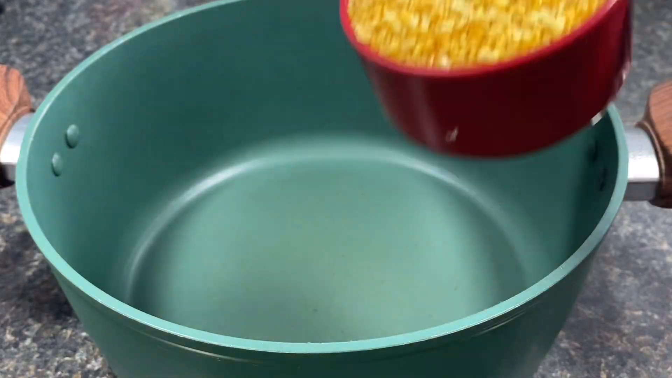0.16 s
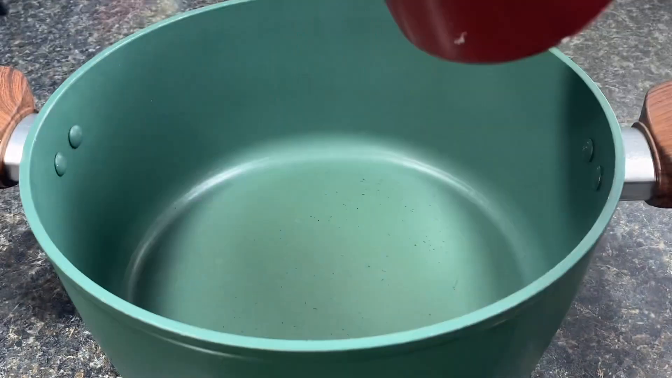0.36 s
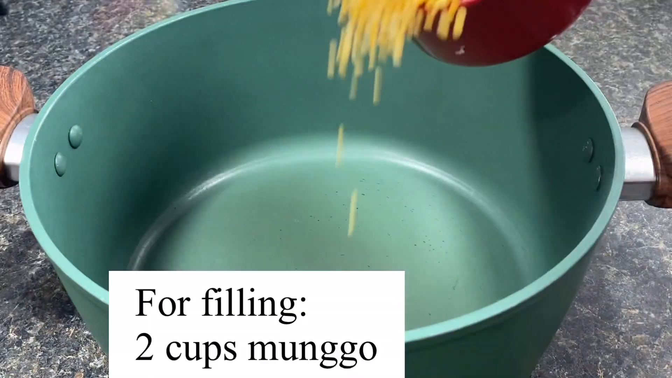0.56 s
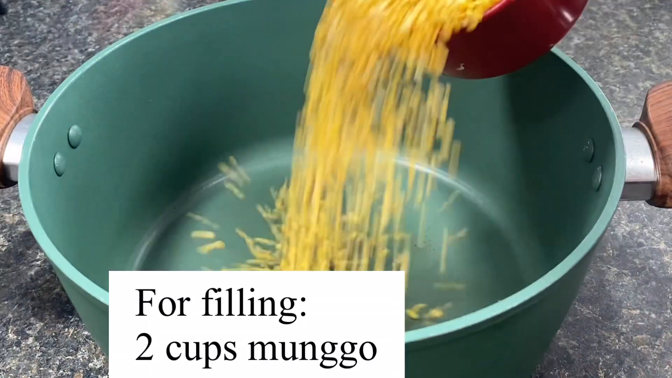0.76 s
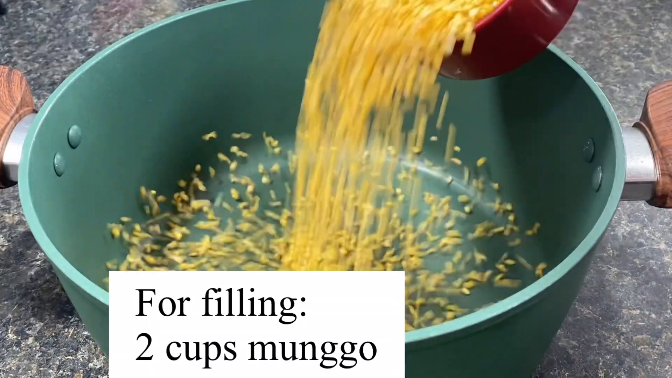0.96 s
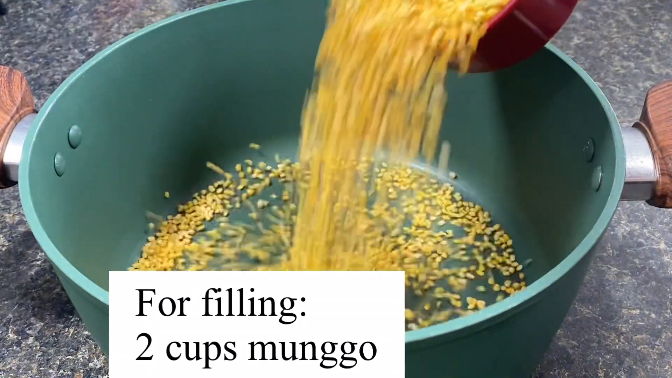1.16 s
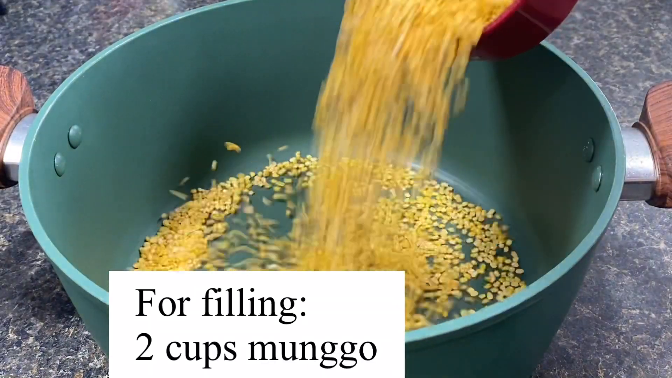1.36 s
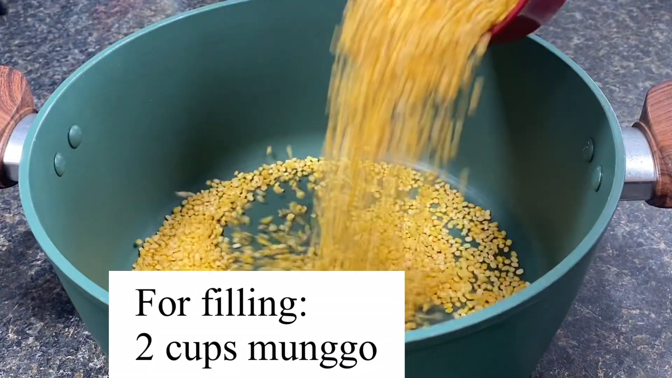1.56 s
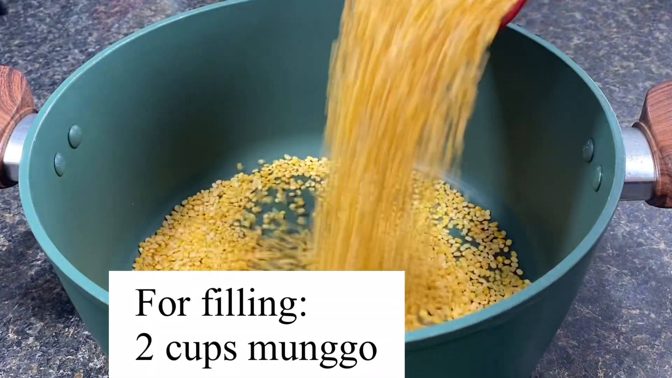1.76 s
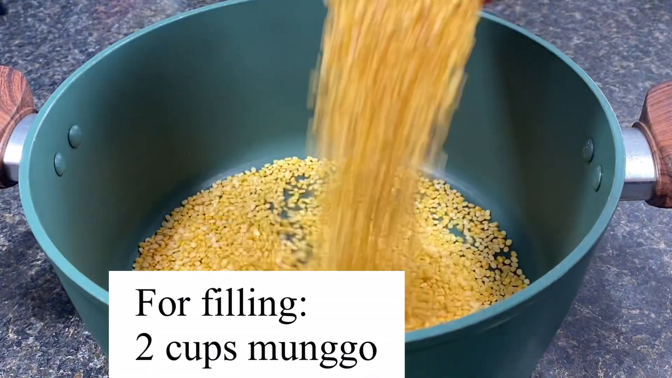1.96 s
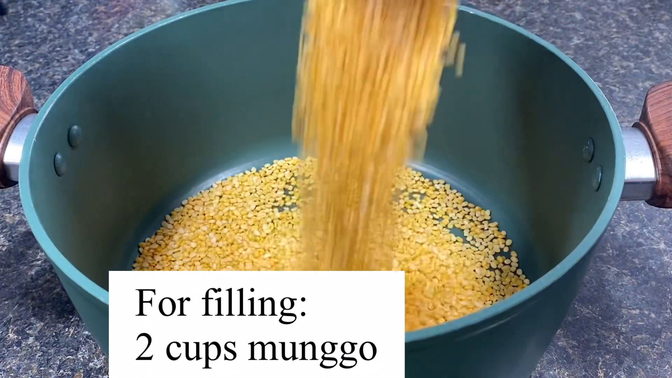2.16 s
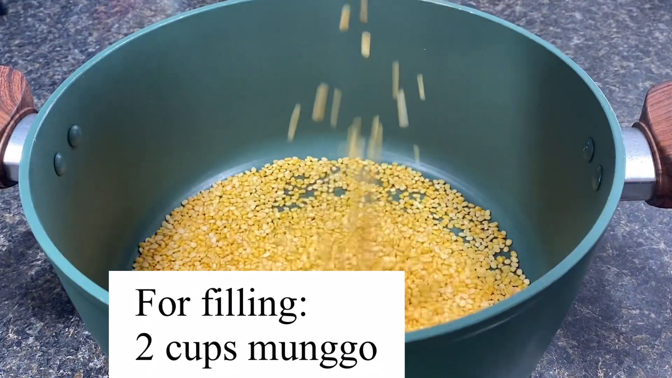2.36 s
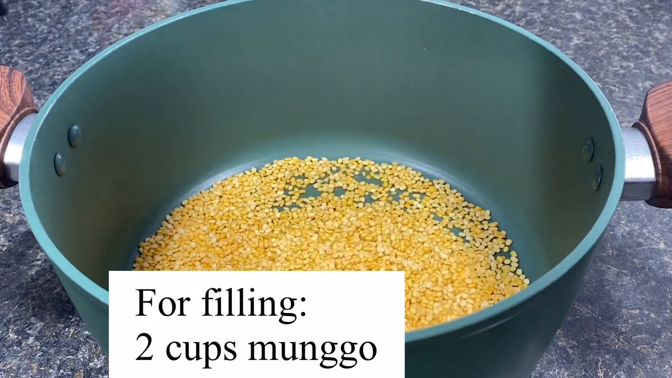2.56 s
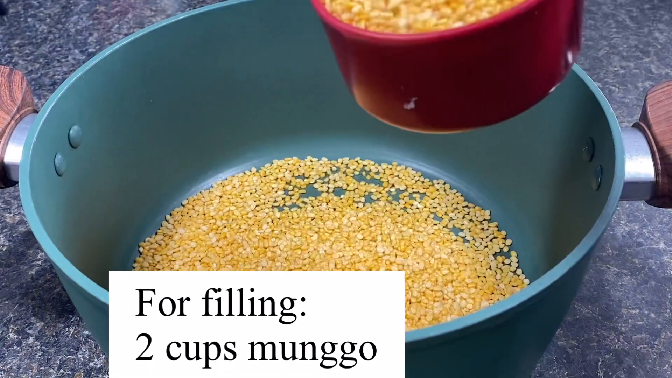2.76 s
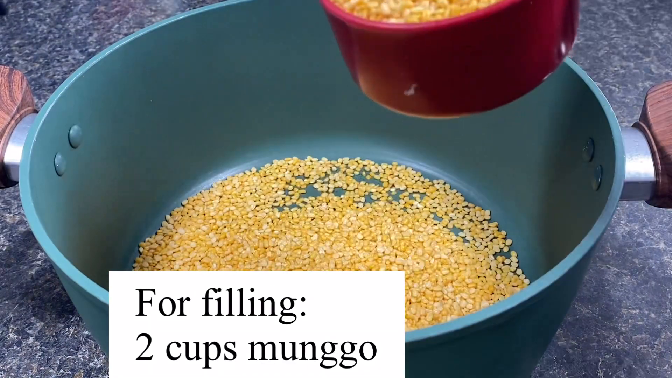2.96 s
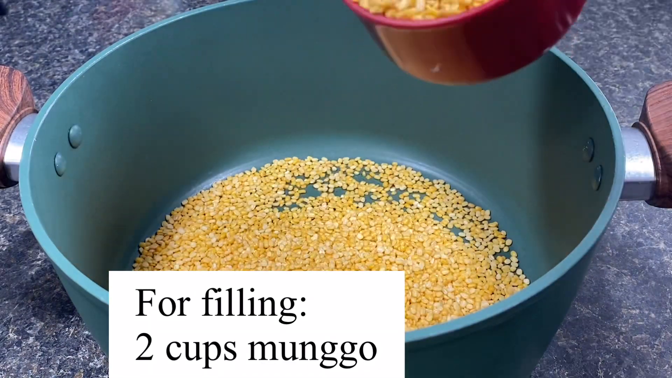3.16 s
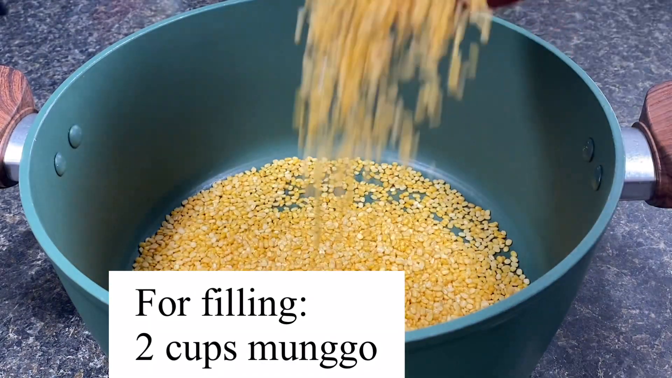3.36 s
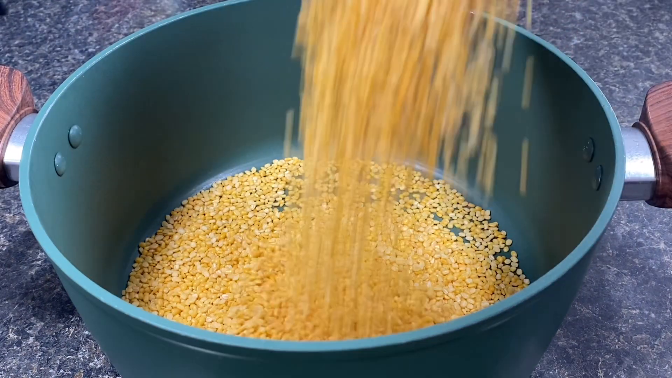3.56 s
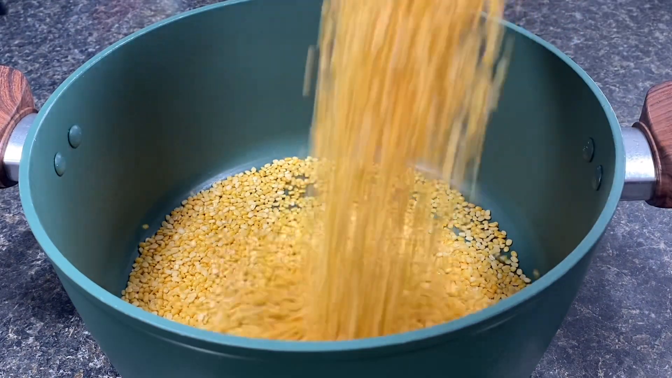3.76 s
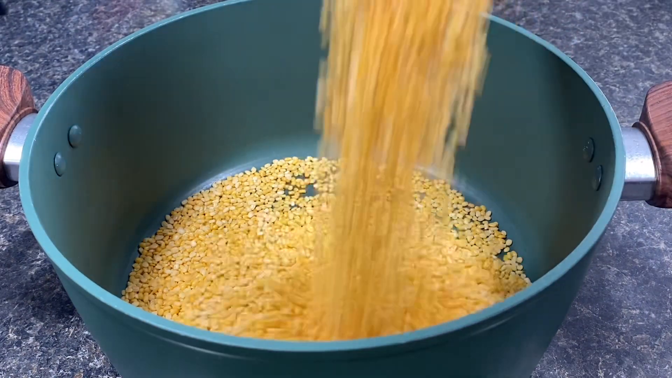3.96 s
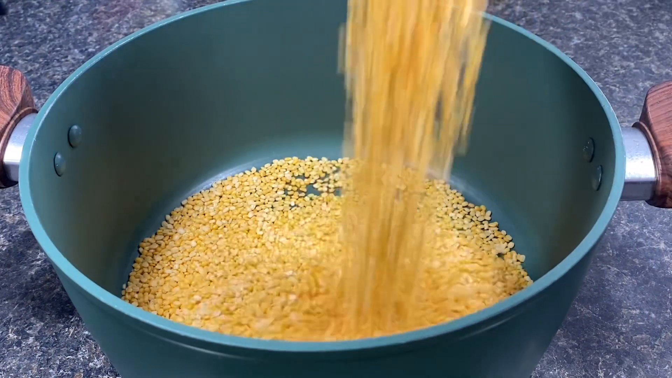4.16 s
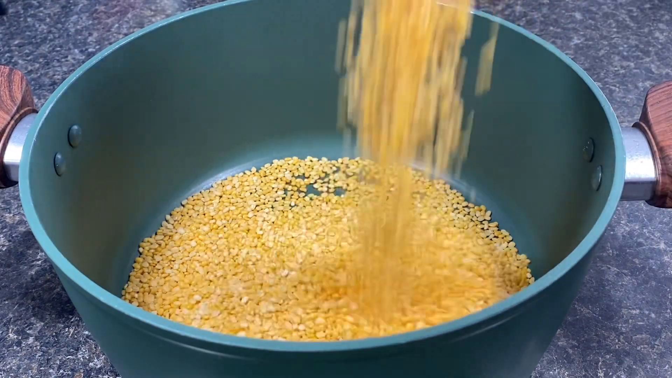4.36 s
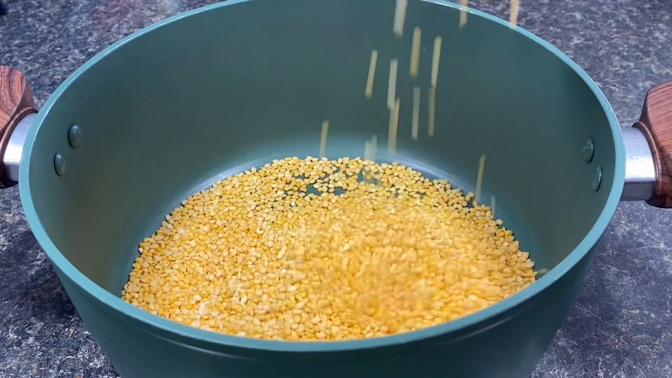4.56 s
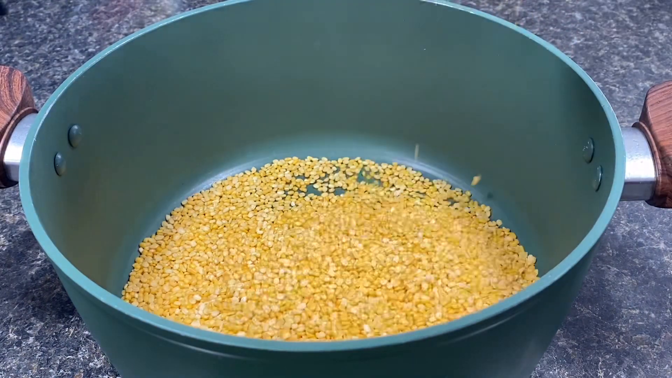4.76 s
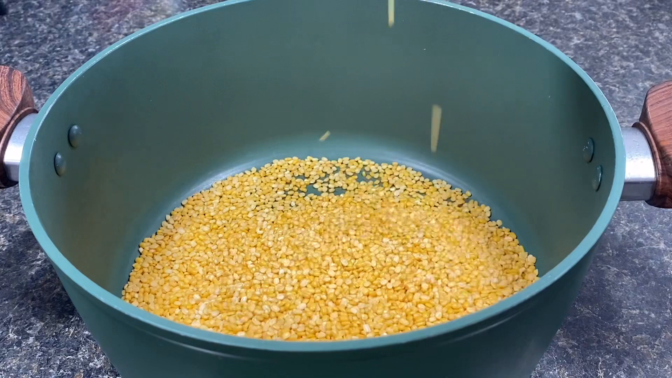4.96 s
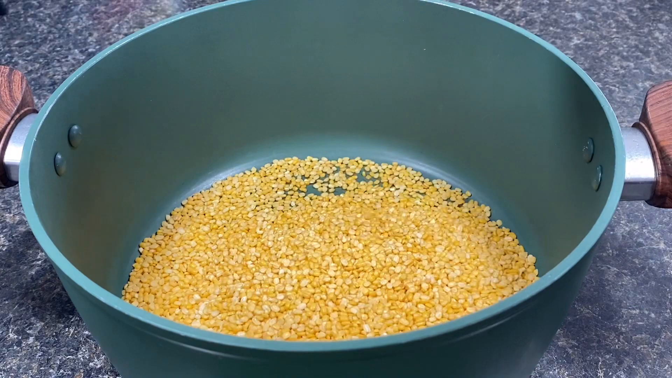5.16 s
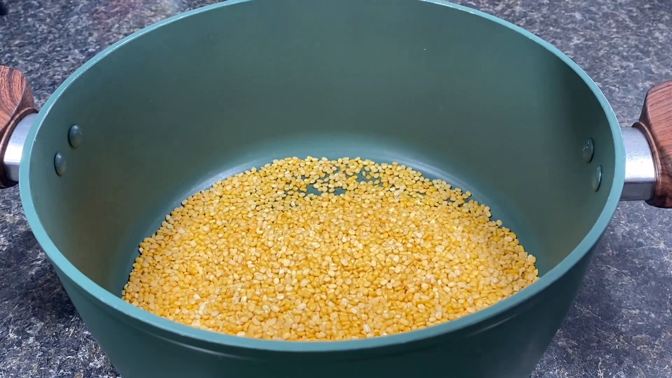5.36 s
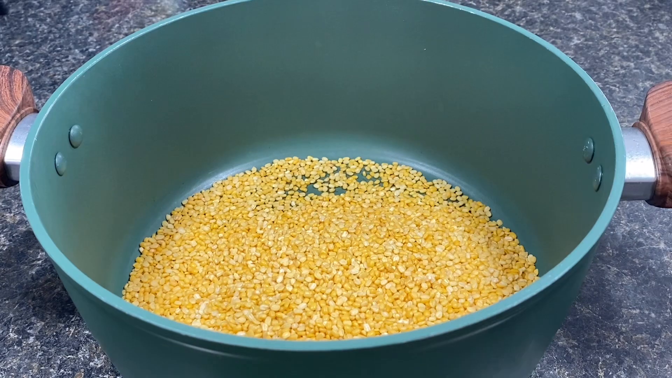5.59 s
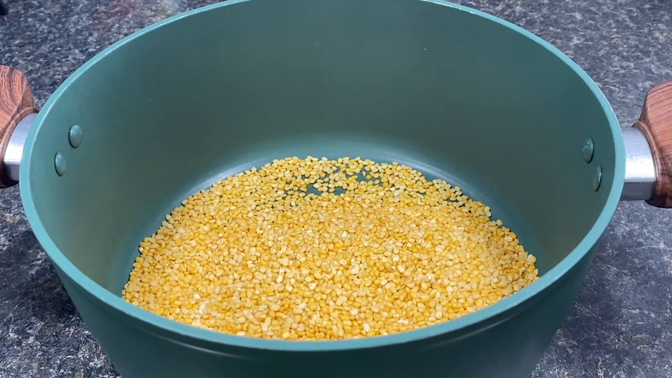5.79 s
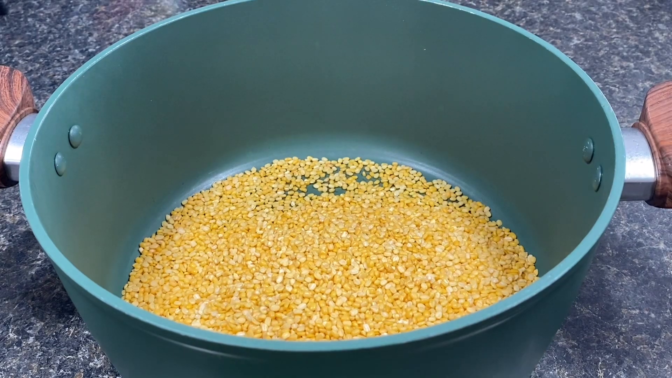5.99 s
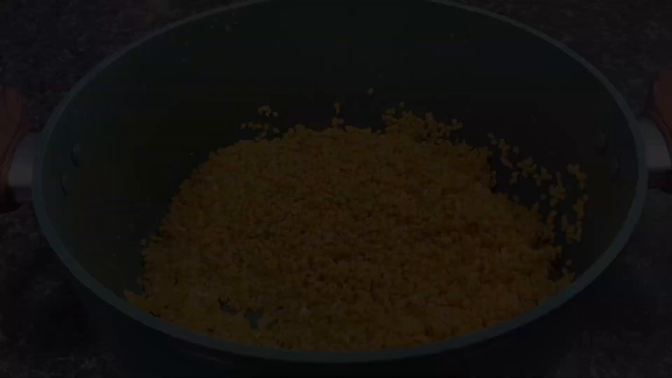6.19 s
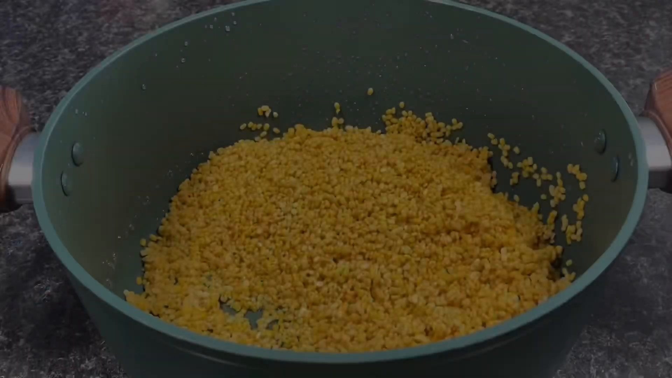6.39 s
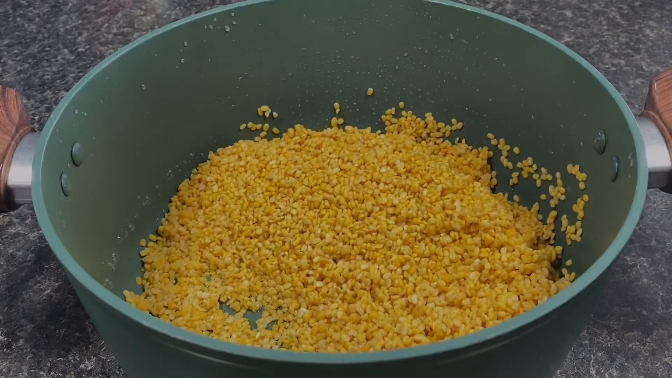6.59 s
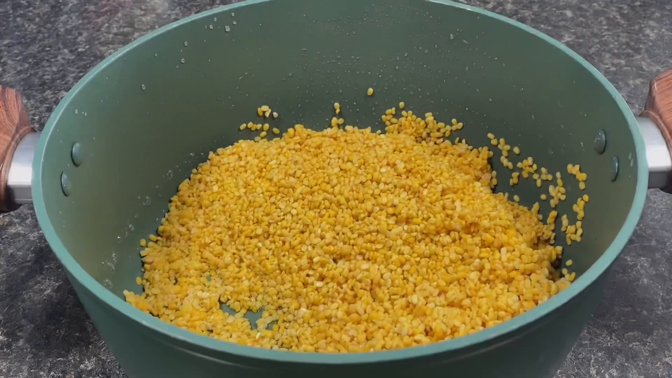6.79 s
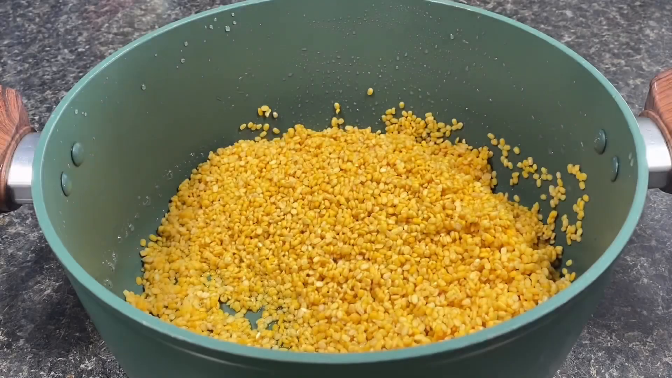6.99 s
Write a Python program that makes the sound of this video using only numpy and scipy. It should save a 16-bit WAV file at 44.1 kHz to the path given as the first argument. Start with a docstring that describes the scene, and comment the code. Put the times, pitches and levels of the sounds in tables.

```python
"""A quiet kitchen, heard from close by: two cups of dry split beans are poured into a metal pot.
Each bean is an impulse: it rings modes of the bare bottom, scatters noise on the heap and shakes the pot.
The empty plastic cup scrapes by stick-slip and is knocked down on the counter; soft shuffles follow.
Filtered noise makes the rumble, hum, air and a faint hiss; a sine makes a thin far tone.
The room tail breaks off abruptly at given moments."""
import sys
import numpy as np
from scipy import signal
from scipy.fft import rfft, irfft, next_fast_len
from scipy.io import wavfile

SR = 44100
rng = np.random.default_rng(int(sys.argv[2]) if len(sys.argv) > 2 else 0)


def digitize_waveform(pressure):
    """Quantize a signal to 16-bit integers and store it at the path in sys.argv[1].

    Rows of a 2-D input are taken as channels; values are limited to [-1, 1].
    """
    field = np.atleast_2d(pressure).T
    bounded = np.clip(field, -1, 1)
    quanta = np.round(bounded * 32767).astype(np.int16)
    wavfile.write(sys.argv[1], SR, quanta)


N = 310280

# the two streams of beans: time_s, weight_db (drive of the pot body), bare (metal exposed, 0-1)
POURS = [
    [(0.66, -75, .9), (0.677, -53, 1), (0.8, -45.5, 0.78), (1.0, -49, 0.87), (1.7, -50.5, 0.81),
     (2.05, -53, .4), (2.35, -56, .1), (2.45, -63, .05), (2.62, -90, .05)],
    [(3.15, -80, 0.02), (3.32, -72, 0), (3.41, -57, 0), (3.6, -53, .1), (3.82, -52, .35), (3.92, -52, .2),
     (4.45, -56.5, .25), (4.6, -60, 0), (4.82, -92, 0)],
]
# single beans: time_s, drive_db, bare (share landing on bare metal, 0-1)
BEANS = [(0.6165, -33, 1), (0.633, -32.5, 1), (0.6673, -33.5, 0.25), (2.477, -67, 0.25),
         (2.5331, -39.5, 0.9), (2.6245, -52, 0), (2.6849, -34, 0.2), (2.7096, -40, 0.5),
         (2.7626, -65, 0.25), (2.7916, -63, 0.5), (2.829, -69.5, 0.1), (3.024, -60, 0),
         (3.1326, -56.5, 0.5), (3.1672, -49, 0.5), (3.1975, -51, 0.7), (4.567, -41, 0), (4.6123, -45.5, 0),
         (4.6633, -40, 0.3), (4.699, -42.5, 0.7), (4.723, -52, 0.25), (4.7416, -48, 0.25),
         (4.8565, -53, 0.2), (4.8716, -58, 0.3), (4.893, -61, 0.25), (4.9037, -47, 0), (4.924, -53, 0.3),
         (5.017, -47, 0.6), (5.0447, -51, 0.32), (5.0856, -34.5, 0), (5.1034, -60, 0.36),
         (5.1267, -43.5, 0.2), (5.1465, -51, 0.25), (5.155, -47, 0.3), (5.1688, -42, 0.9),
         (5.2195, -57, 0.3), (5.282, -69, 0.32)]
# noise spectrum of bean on bean: frequency_hz, gain_db
PATTER = [(400, -46.5), (1500, -8.5), (3800, -2.5), (4600, 5), (5900, 4.5), (7400, 8.5), (10000, 8),
          (13000, 6.5), (16000, 9.5)]
# knocks of the cup: time_s, drive_db, thump_db and crack_db (both relative to drive_db)
KNOCKS = [(5.598, -40, -8.5, -11), (5.775, -60.5, -10, 9), (5.908, -26, -8.5, -1.5),
          (5.9338, -26, -13.5, -4), (5.9429, -25, -15, -17), (5.9588, -42, 1, -10),
          (6.0343, -42, -11.5, -9.5), (6.1409, -63, 0, 7.5), (6.536, -65.5, -5, 12.5)]
# start, moments at which the room tail breaks off, end: time_s
BREAKS_S = [0, 2.748, 5.597, 6.147, 7.04]


def undb(db):
    """Decibel law: amplitude gain of a level."""
    return 10 ** (np.asarray(db) / 20)


def unit(x):
    """Power normalisation: x scaled to rms 1."""
    return x / np.sqrt(np.mean(x ** 2))


def samples(time_s):
    """Sampling: times as sample numbers."""
    return (np.asarray(time_s) * SR).astype(int)


def curve(tables, outside):
    """Linear interpolation of (time_s, value, ...) tables; `outside` holds the values elsewhere."""
    t = np.arange(N) / SR
    out = [np.full(N, 1. * value) for value in outside]
    for table in tables:
        s, *columns = np.transpose(table)
        on = (t >= s[0]) & (t < s[-1])
        for track, column in zip(out, columns):
            track[on] = np.interp(t[on], s, column)
    return out


def colour(x, spectrum):
    """Linear filtering: (frequency_hz, gain_db) points, joined over log frequency, laid on x."""
    hz, db = np.transpose(spectrum)
    size = next_fast_len(N, True)
    f = np.fft.rfftfreq(size, 1 / SR) + 1
    gain = undb(np.interp(np.log(f), np.log(hz), db))
    return irfft(rfft(x, size) * gain, size)[:N]


def noise(spectrum):
    """Broadband noise: random samples coloured by a spectrum, at rms 1."""
    return unit(colour(rng.standard_normal(N), spectrum))


def ring(at, size, modes, spread_db):
    """Modal excitation: each blow drives every mode with its own random strength and sign."""
    build_up = 4  # width of the front resonance over that of the mode
    out = np.zeros(N)
    start, end = at.min(), min(at.max() + SR // 2, N)
    for hz, width_hz, db in modes:
        strength = size * undb(db + spread_db * rng.standard_normal(len(at)))
        sign = rng.choice([-1, 1], len(at))
        blows = np.bincount(at - start, strength * sign, end - start)
        # a wider resonance in front: the mode builds up over a few cycles and its skirts fall steeply
        r = np.exp(-np.pi * width_hz * np.array([build_up, 1]) / SR)
        g = (1 - r * r) / 2
        turn = -2 * r * np.cos(2 * np.pi * hz / SR)
        sections = np.array([g, 0 * g, -g, 1 + 0 * g, turn, r * r]).T.copy()
        out[start:end] += signal.sosfilt(sections, blows)
    return out


def ticks(at, size, t60):
    """Diffuse decay: each blow adds power to a noise whose level falls 60 dB in t60 seconds."""
    r = np.exp(-2 * np.log(1000) / (t60 * SR))
    power = signal.lfilter([1], [1, -r], np.bincount(at, size ** 2, N))
    return np.sqrt(power + 1e-18) * rng.standard_normal(N)


def stream():
    """Random point process: sample times, sizes, body drive and bare share of streamed and single beans."""
    # beans sliding in the cup before a pour and dribbling after it: time_s, patter_db
    trickles = [
        [(0.37, -100), (0.42, -72), (0.655, -55), (0.68, -45)],
        [(2.4, -70), (2.5, -65), (2.66, -62), (2.748, -56)],
        [(2.749, -86), (2.85, -88), (2.92, -100)],
        [(3.03, -92), (3.15, -62), (3.36, -57), (3.5, -65)],
        [(4.55, -62), (4.7, -61), (4.85, -69), (4.93, -60), (4.98, -65.5), (5.16, -55), (5.2, -67), (5.3, -76),
         (5.4, -100)],
    ]
    full_per_s, spread_db = 9000., 2  # rate at full density, mean random rise of a bean
    heap_db, metal_db = 4.5, 16  # patter drive over body drive on the heap; what bare metal adds
    lone_body_db = -22  # body drive of a single bean relative to its size
    weight_db, bare = curve(POURS, [-130, 0])
    bare = np.clip(bare, 0, 1)
    poured = undb(weight_db + heap_db + metal_db * bare)
    trickled = undb(curve(trickles, [-120])[0])
    db = 10 * np.log10(poured ** 2 + trickled ** 2)
    # a weak flow has fewer beans, each scaled up to hold the power
    density = np.clip(undb(.6 * (db + 42)), .1, 1)
    at = np.flatnonzero(rng.random(N) < density * full_per_s / SR)
    size = undb(spread_db * rng.exponential(size=len(at)) + db[at] - 12.5) / np.sqrt(density[at])
    s, lone_db, lone_bare = np.transpose(BEANS)
    all_at = np.r_[at, samples(s)]
    all_size = np.r_[size, undb(lone_db)]
    body_db = np.r_[(weight_db - db)[at], np.full(len(s), lone_body_db)]
    return all_at, all_size, body_db, np.r_[bare[at] ** 2, lone_bare]


def impact(at, size, bare):
    """Division of impact power: the bare share rings the bottom, the rest patters as scattered noise."""
    # resonances of the bare pot bottom: frequency_hz, width_hz, gain_db
    bottom_modes = [(2380, 130, -19), (2630, 200, -19), (3360, 200, -15), (4550, 200, -11),
                    (4850, 300, -15), (5170, 120, -10), (5390, 50, -6), (5600, 100, -5), (6590, 180, -9),
                    (6900, 170, -5), (7540, 220, -7), (7950, 300, -11), (8725, 90, 2), (9400, 70, -3),
                    (9900, 150, -7), (10300, 90, -8), (11360, 350, -9), (12560, 140, -3), (13550, 260, -7),
                    (14125, 100, -11), (14860, 450, -11)]
    bare = np.clip(bare, 0, 1)
    patter = colour(ticks(at, size * np.sqrt(1 - bare), t60=0.024), PATTER)
    bottom = ring(at, size * np.sqrt(bare), bottom_modes, spread_db=4)
    return patter + undb(35) * bottom


def snaps():
    """Contact transient: the hard first touch of each single bean is a click and a short burst."""
    s, lone_db, _ = np.transpose(BEANS)
    at = samples(s)
    click = np.bincount(at, undb(lone_db + 3.5), N)
    burst = ticks(at, undb(lone_db + 2.5), t60=0.0042)
    return colour(click + burst, PATTER)


def body(at, size, body_db):
    """Modal loading: beans shake walls and air of the pot; the heap alters mode gains, bass radiates weakly."""
    # walls and air of the pot: frequency_hz, width_hz, first_cup_db, loaded_db (gain once it holds beans)
    body_modes = [(515.5, 78, -3.5, -1), (663, 120, 0.5, -2), (885, 89, -5, -5.5), (1102, 170, 1.5, -1),
                  (1386, 200, -9.5, -2), (1600, 100, -5, -7), (1946, 130, -3.5, -4), (2690, 900, -3.5, -5),
                  (4600, 160, -6, -5.5), (5170, 280, -7, -7)]
    hz, width_hz, *load_db = np.transpose(body_modes)
    drive = size * undb(body_db)
    first = at < BREAKS_S[1] * SR
    shaken = 0
    for chosen, db in zip([first, ~first], load_db):
        shaken = shaken + ring(at[chosen], drive[chosen], zip(hz, width_hz, db), spread_db=2.6)
    return undb(31) * colour(shaken, [(200, -18.0), (400, 1), (480, -1), (16000, 5.5)])


def drags():
    """Friction envelope: summed power of overlapping drags, each gripping, then swelling or fading."""
    # drags of the cup: start_s, length_s, lowest modes at start_db and end_db,
    # then middle_db, upper_db, grit_db relative to the lowest modes
    scrapes = [(2.612, .136, -61.5, -50.5, -6.5, -17, -24), (4.775, 0.11, -64, -79, -3, -10, -11),
               (4.905, .165, -58.5, -67.5, -0.5, -19, -24), (5.597, 0.26, -43.5, -73, -16.5, -14, -2),
               (5.74, .165, -82.5, -52.5, 6.5, 5.5, 2), (5.95, 0.18, -48.5, -75, -14, -16, 3.5)]
    grip_s, bend_db = 0.0029, -3.5  # onset; offset of the middle from the straight line
    power = 0
    for s, length, a, b, *group_db in scrapes:
        onset_db = a - 12 * (a > b)  # a drag that fades starts from below
        middle = (s + length / 2, (a + b) / 2 + bend_db)
        db = curve([[(s, onset_db), (s + grip_s, a), middle, (s + length, b)]], [-160])[0]
        power = power + undb(2 * (db + np.c_[[0, *group_db]]))
    db = 10 * np.log10(power)
    return db[0], *(db[1:] - db[0])


def waver():
    """Random modulation: a level in dB that wanders between random knots."""
    depth_db, knots_per_s = 2, 40
    knots = rng.standard_normal(int(N / SR * knots_per_s) + 2)
    return depth_db * np.interp(np.arange(N) / SR * knots_per_s, np.arange(len(knots)), knots)


def cup():
    """Stick-slip and impact: random slips and knocks ring the cup's modes, with noise for grit and crack."""
    # four groups (lowest, middle, upper, those that follow the grit in drags): frequency_hz, width_hz, gain_db
    cup_modes = [
        [(1420, 60, 0)],
        [(2650, 60, 0), (2900, 90, -5)],
        [(4040, 90, -9), (5130, 90, -3), (5380, 110, 0), (6490, 120, -10), (7390, 120, -7)],
        [(560, 90, -2), (1180, 120, 0), (1300, 80, 0), (1780, 90, -3)],
    ]
    db, middle_db, upper_db, grit_db = drags()
    dragged = db > -139
    at = np.flatnonzero((rng.random(N) < 4000. / SR) & dragged)
    slip = undb(db[at] + 2.0 * rng.exponential(size=len(at)))
    scrape = 0
    for group_db, modes in zip([np.full(N, 32.), middle_db + 33, upper_db + 30.5, grit_db + 26.5], cup_modes):
        uneven_db = group_db + waver()  # each group catches unevenly
        scrape = scrape + ring(at, slip * undb(uneven_db[at]), modes, spread_db=1.9)
    scrape = scrape * dragged
    grit_noise = noise([(150, 3.0), (600, -2.5), (2000, 2.5), (3500, -7.5), (8000, -13.5), (16000, -23.5)])
    grit = undb(db + grit_db - 1.5) * grit_noise
    s, knock_db, _, crack_db = np.transpose(KNOCKS)
    at = samples(s)
    knock = 0
    for group_db, modes in zip([35.4, 31, 28.5, 28.88], cup_modes):
        knock = knock + ring(at, undb(knock_db + group_db), modes, spread_db=0.9)
    crack = colour(ticks(at, undb(knock_db + crack_db), t60=0.016),
                   [(500, -13.0), (2000, 11.5), (5500, 5.0), (9000, 0.5), (16000, -7.5)])
    return scrape + grit + knock + crack


def counter():
    """Forced low modes and diffuse noise: the counter thumps under each knock; shuffles are dull puffs."""
    # resonances of the counter: frequency_hz, width_hz, gain_db
    counter_modes = [(90, 30, -6), (195, 40, 0), (285, 70, 0), (520, 70, -2), (640, 90, -5)]
    # soft shuffles nearby: time_s, drive_db, bright_db (bright part relative to drive_db)
    shuffles = [(6.187, -55.5, -31.5), (6.224, -69, -26), (6.332, -65, -11), (6.389, -60.5, -11),
                (6.594, -58.5, -20), (6.668, -58.5, -14), (6.799, -65, -11), (6.889, -70, -17.5)]
    s, knock_db, thump_db, _ = np.transpose(KNOCKS)
    thump = ring(samples(s), undb(knock_db + thump_db + 48), counter_modes, spread_db=1)
    s, drive_db, bright_db = np.transpose(shuffles)
    at = samples(s)
    dull = colour(ticks(at, undb(drive_db), t60=0.16),
                  [(150, -1), (300, 8), (600, 12), (1000, -9.5), (3000, -45)])
    bright = colour(ticks(at, undb(drive_db + bright_db), t60=0.2),
                    [(500, -15), (1000, 1), (2400, 9), (3200, -11), (8000, -40)])
    return thump + dull + bright


def echo(x):
    """Reverberation: convolution with decaying noise, broken off at each of the given moments."""
    t60_s, level_db = 0.083, -8
    t = np.arange(SR // 2) / SR
    tail = rng.standard_normal(len(t)) * np.exp(-np.log(1000) * t / t60_s)
    edges = np.minimum(samples(BREAKS_S), N)
    spans = [signal.fftconvolve(x[a:b], tail)[:b - a] for a, b in zip(edges, edges[1:])]
    return undb(level_db) * np.concatenate(spans) / np.sqrt(np.sum(tail ** 2))


def kitchen():
    """Incoherent power sum: rumble, appliance hum that the pours reinforce, air and two faint sounds."""
    # background: time_s, deep_db, hum_db
    rumble = [(0.0, -60.5, -70), (1.0, -56, -69), (2.5, -53, -71.5), (2.748, -51.5, -64.5),
              (2.8, -66.5, -77.5), (3.6, -63.5, -70.5), (4.2, -56, -63.5), (4.7, -63.5, -70),
              (5.1, -55, -65.5), (6.0, -56, -55.5), (6.2, -60, -63.5), (7.04, -59.5, -66)]
    # air noise spectrum: frequency_hz, gain_db
    air_spectrum = [(300, 2), (500, -3.5), (1300, -16), (7000, -27.5), (11000, -33), (16000, -34.5)]
    # a faint hiss: time_s, level_db
    rustle = [(6.47, -99), (6.5, -81), (6.54, -60.5), (6.62, -72), (6.72, -100.5)]
    # a thin far tone: time_s, level_db
    whine = [(6.79, -110), (6.82, -77), (6.88, -98), (6.94, -85.5), (7.0, -100)]
    whine_hz, air_db = 3195, -77
    boom_db = -13  # counter boom under the stream, relative to the weight of the stream
    deep_db, hum_db = curve([rumble], [-62, -70])
    deep = noise([(18, -42.5), (35, -17.5), (46, -7), (54, 2), (63, -5.5), (78, -2.5), (110, -14.0), (200, -61.5)])
    hum = noise([(70, -35.5), (120, 2.0), (150, -3), (200, -4.5), (350, -16.5), (700, -47)])
    air = noise([(150, -51.5)] + air_spectrum)
    hiss = noise([(500, -10.5), (2000, -3.5), (5000, 1.5), (9000, -12), (16000, -4.0)])
    tone = np.sin(2 * np.pi * whine_hz * np.arange(N) / SR)
    far = undb(curve([rustle], [-140])[0]) * hiss + undb(curve([whine], [-140])[0]) * tone
    boom = undb(curve(POURS, [-130, 0])[0] + boom_db)
    return undb(deep_db) * deep + np.hypot(undb(hum_db), boom) * hum + undb(air_db) * air + far


def scene():
    """Mid-side stereo: treble is nearly alike on both sides; fresh random draws set left and right apart below."""
    # filter of the side signal: frequency_hz, gain_db
    side_spectrum = [(60, -19), (130, -15.5), (250, -8.5), (500, -6.5), (1400, -5.5), (2000, -13),
                     (2400, -41), (16000, -43)]
    lean = 0.46  # share of cup and counter taken from the side, before its filter, once the cup is aside
    at, size, body_db, bare = stream()
    handled = cup() + counter()
    near = impact(at, size, bare) + snaps() + body(at, size, body_db) + handled
    mid = near + echo(near) + kitchen()
    # from here on cup and counter lean to the right
    late = np.arange(N) / SR >= BREAKS_S[2]
    aside = undb(np.where(late, 6., -2.)) * cup() - lean * late * handled
    side = colour(body(at, size, body_db) + aside + kitchen(), side_spectrum)
    return np.array([mid + side, mid - side])


def record(dry):
    """Interchannel phase: two pickup ports turn apart towards the treble; a steep low-pass cuts the top."""
    # phase by which left leads right: frequency_hz, lead_rad
    ports = [(0, 0), (430, 0.5), (950, 0.1), (1290, 0.6), (2150, 0.0), (7490, -0.1), (8610, -2.9),
             (9560, -3.4), (10500, -6.1), (11600, -6.5), (12900, -9.4), (13800, -9.6), (14900, -12.5),
             (16500, -12.7)]
    top_hz = 15680
    hz, lead = np.transpose(ports)
    size = next_fast_len(N, True)
    # half the lead goes to each side
    turn = np.exp(.5j * np.interp(np.fft.rfftfreq(size, 1 / SR), hz, lead))
    wet = irfft(rfft(dry, size) * np.array([turn, turn.conj()]), size)[:, :N]
    return signal.sosfilt(signal.ellip(16, .3, 75, top_hz, fs=SR, output="sos"), wet)


dry = scene()
out = record(dry)
digitize_waveform(out)
```